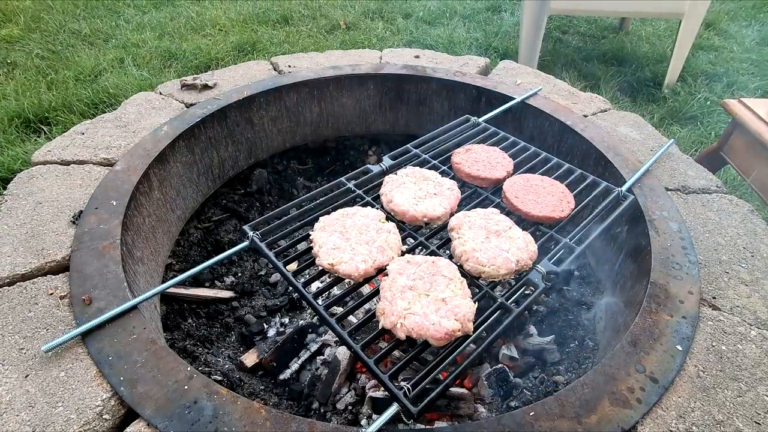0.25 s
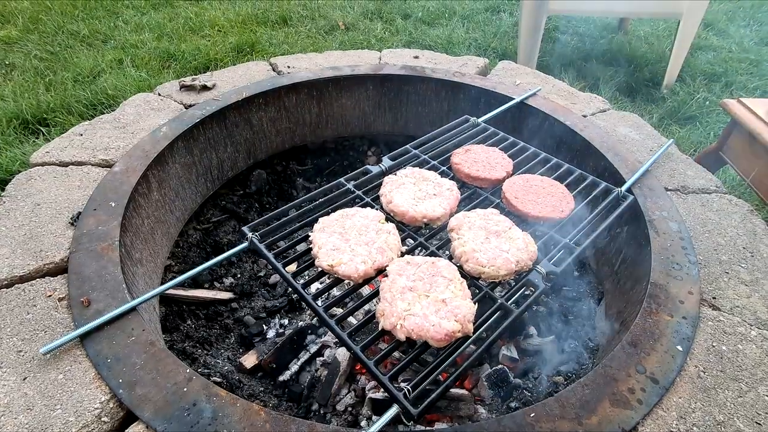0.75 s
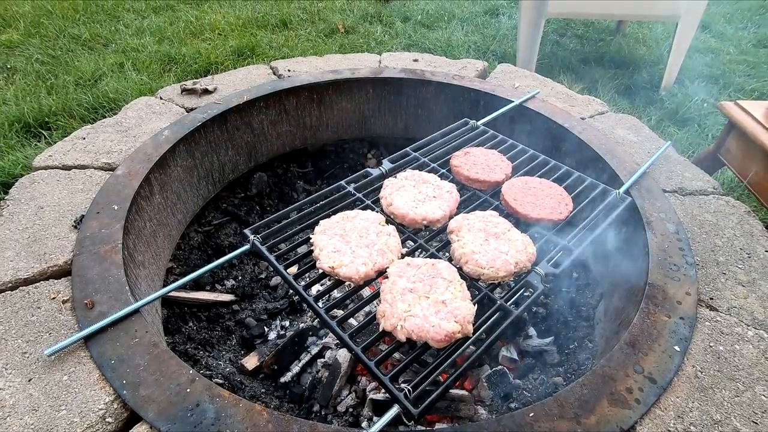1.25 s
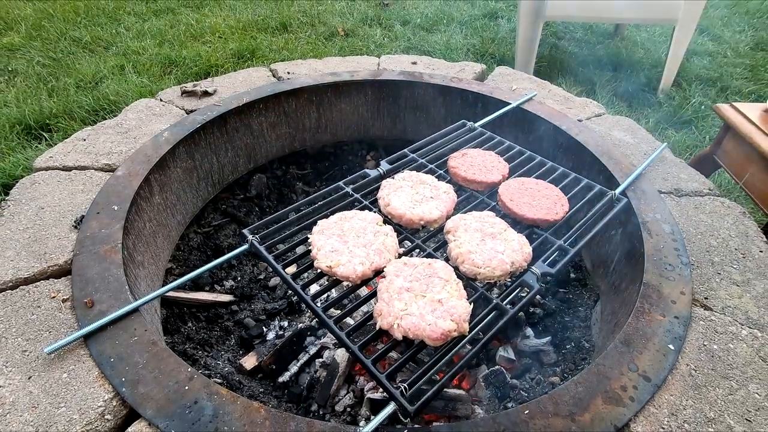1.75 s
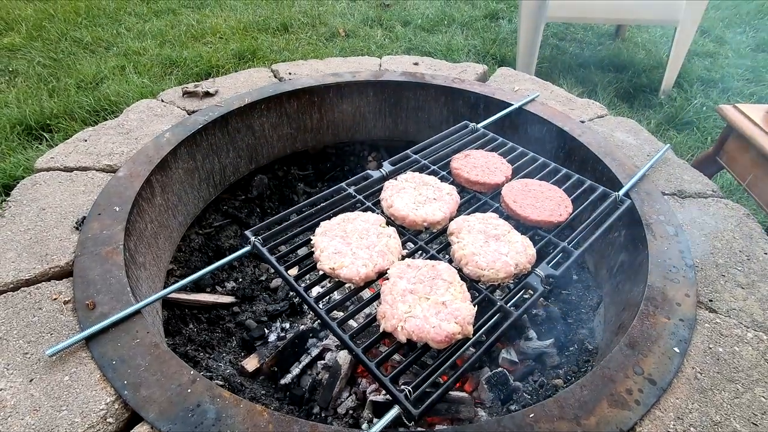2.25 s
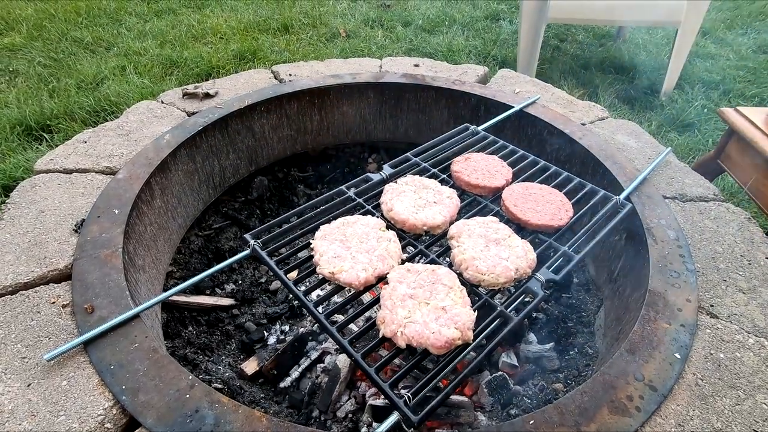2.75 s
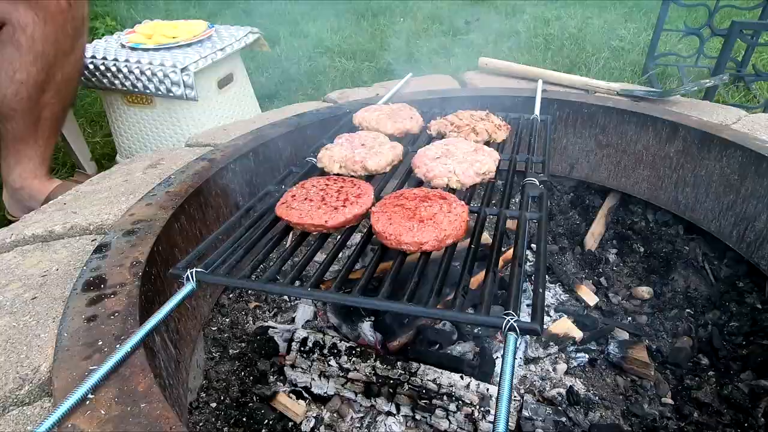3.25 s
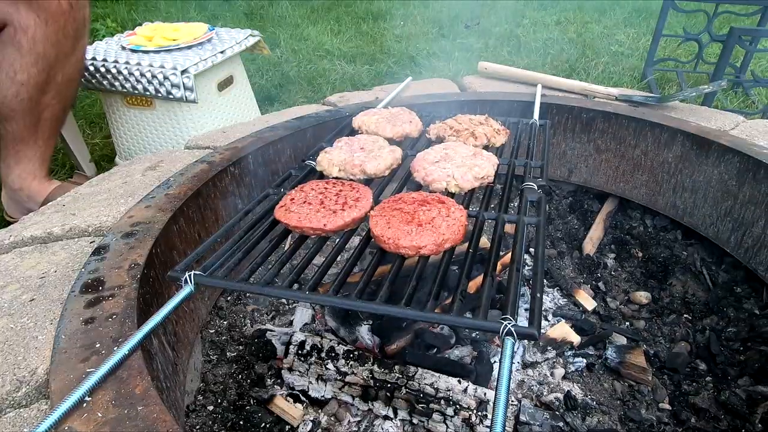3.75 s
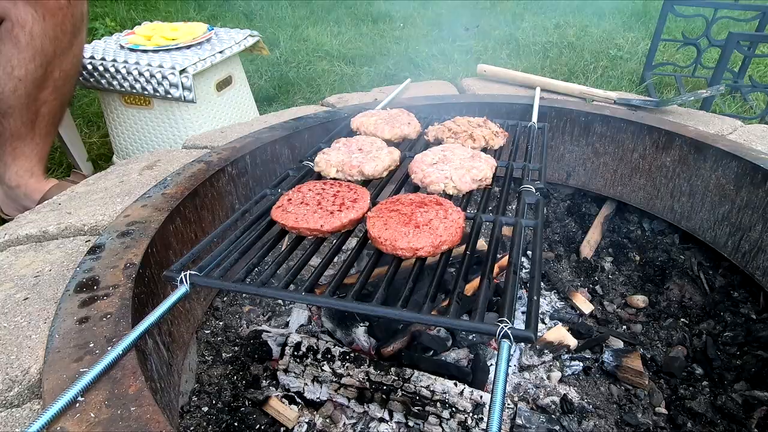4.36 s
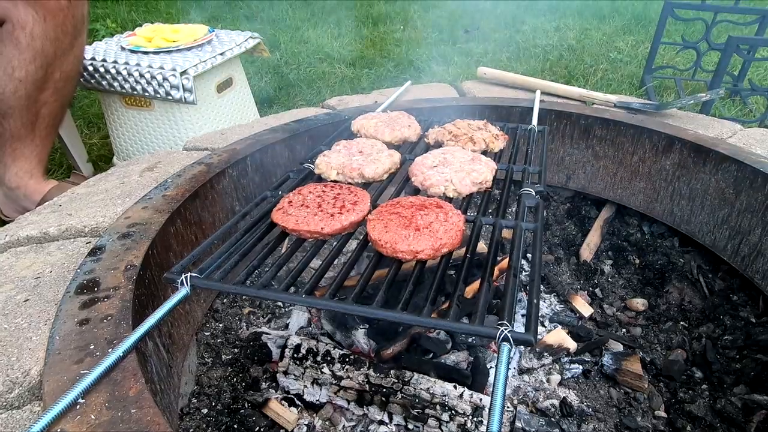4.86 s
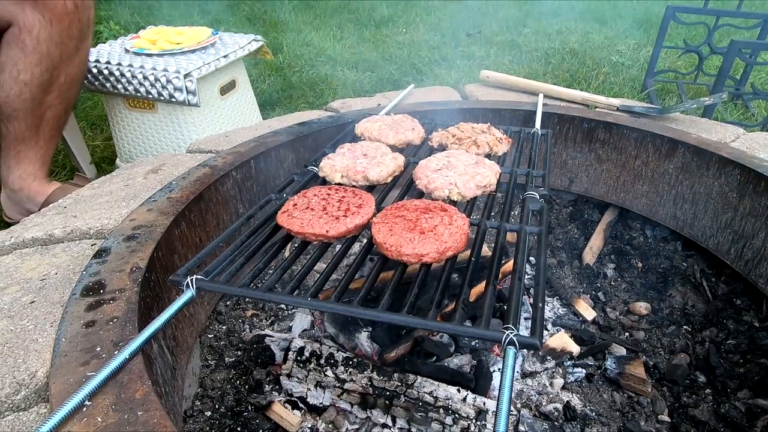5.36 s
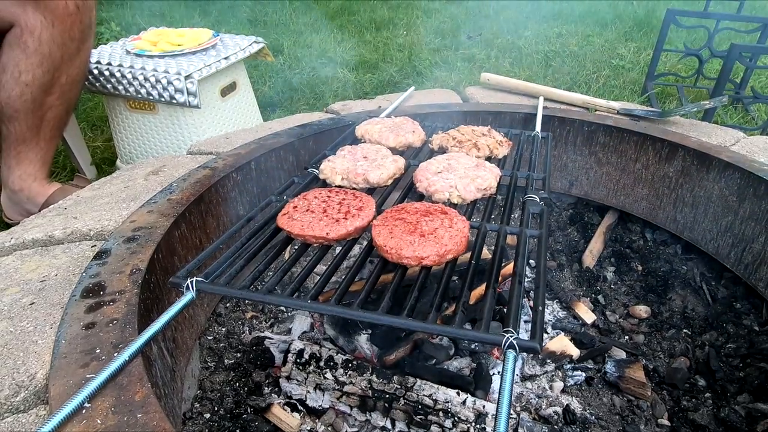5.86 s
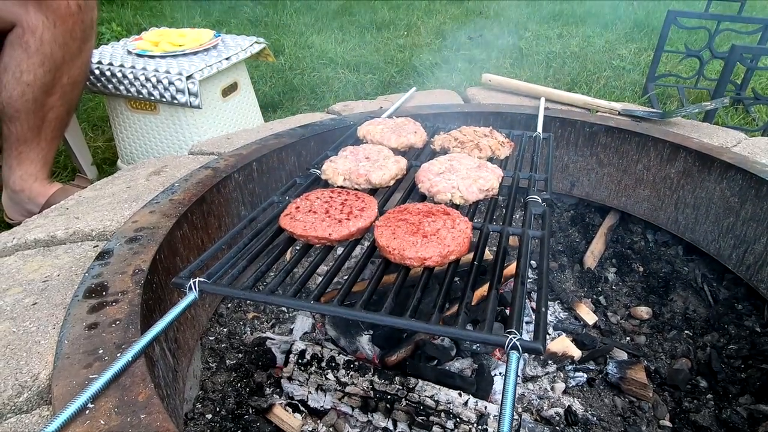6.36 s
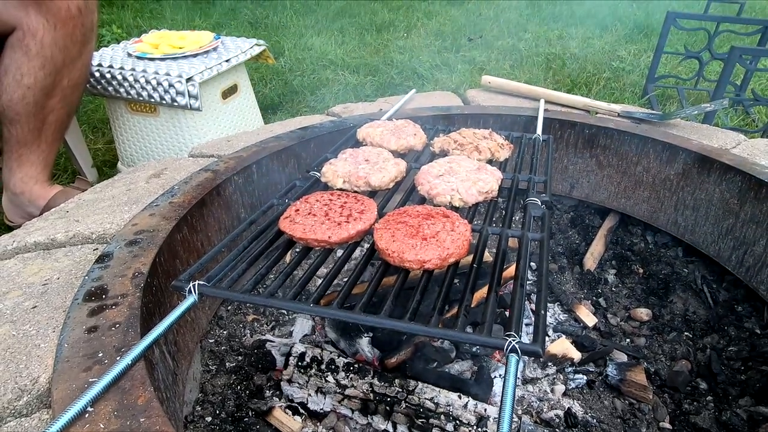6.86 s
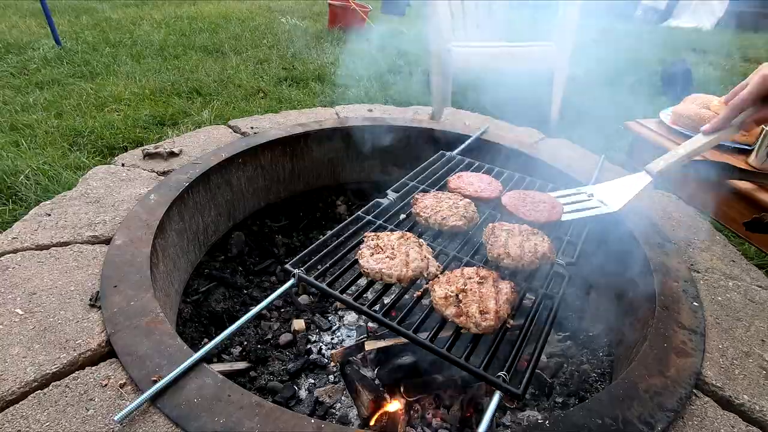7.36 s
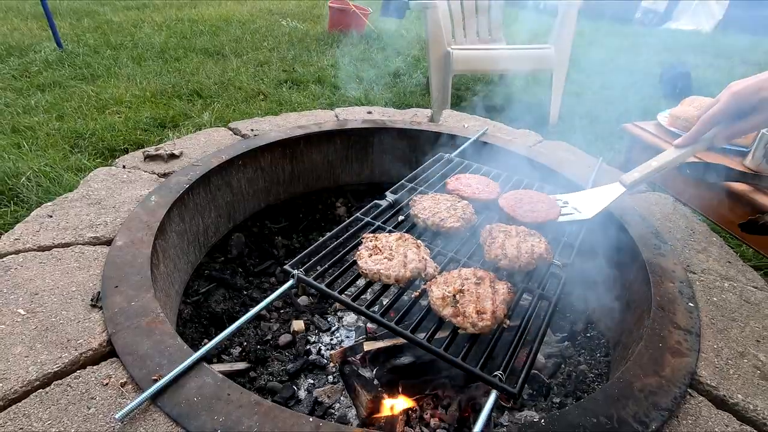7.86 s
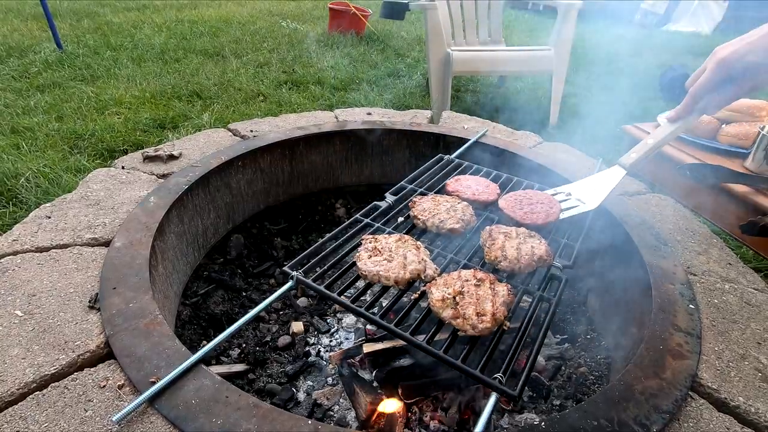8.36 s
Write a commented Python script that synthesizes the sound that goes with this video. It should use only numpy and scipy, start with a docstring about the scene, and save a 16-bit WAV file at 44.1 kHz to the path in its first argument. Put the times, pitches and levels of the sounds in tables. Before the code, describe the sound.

Outdoors, close to a fire pit, frying patties give a steady, thin, high fizz with tiny spitting ticks. After about three seconds the position shifts: fat hisses on coals and embers pop, two of them sharply. At the end, another shift brings a metal spatula scraping in quick shoves, groaning and clinking against the grate, while a small bird trills. Faint distant traffic hums underneath; one channel.

```python
"""Frying fat fizzes first: meat patties on a steel grate over a garden fire pit, heard from three spots in turn.
Bursting bubbles are random clicks; drips hiss on the coals, and embers pop with crackle and short rings.
Near the end a metal spatula scrapes in short shoves: sticking and slipping drives the modes of blade and grate.
A small bird trills then, in sine notes arched in pitch. Light air and distant traffic, shaped noise
and wavering tones, lie below."""
import sys
import numpy as np
from scipy import signal
from scipy.fft import rfft, irfft, next_fast_len
from scipy.io import wavfile

SR = 44100
rng = np.random.default_rng(int(sys.argv[2]) if len(sys.argv) > 2 else 0)


def dump(signal):
    """Clip the signal to [-1, 1] and save it as 16-bit WAV at the path in sys.argv[1]."""
    limited = np.clip(np.atleast_2d(signal).T, -1, 1)
    pcm = np.round(limited * 32767).astype(np.int16)
    wavfile.write(sys.argv[1], SR, pcm)


N = 380141
TIME = np.arange(N) / SR

# Listening spots; the frying also gets a makeup gain: [start_s, frying_drive_db, coals_hiss_db]
SPOTS = [(0, -64, -77), (3.287, -68, -66), (7.295, -70.5, -87)]
# Slow rise and fall of the heat, which the frying follows: [time_s, change_db]
HEAT = [(0, 0.5), (.35, 0.5), (1.05, -1), (2.1, 1.5), (3.0, 0.4), (5.9, 0.5), (6.6, -1), (8.6, 1)]
# Relative spectrum of the frying fat, close by: [freq_hz, density_db_per_hz]
FIZZ_NEAR = [(1500, -13.5), (3000, -10), (5500, -7), (6700, -6.5), (7600, -1), (8600, -0.5), (9500, -2.5),
             (10400, -7.5), (11600, -7.5), (12700, -4.5), (14000, -3.5), (15700, -8)]
# Relative spectrum of the frying fat, from across the pit: [freq_hz, density_db_per_hz]
FIZZ_FAR = [(1500, -12), (3100, -6), (4700, -5.5), (5700, 1), (6500, -2), (7600, 3), (8700, -1),
            (9500, -2.5), (10500, -6.5), (12000, -5), (13700, -4), (15700, -7)]
# Droplets of fat spitting, dry and without pitch: [start_s, level_db, lowest_hz]
SPITS = [(.3414, -40, 6920), (2.6508, -43, 5000), (3.684, -39, 6000), (4.2409, -42, 6000),
         (4.3634, -38.5, 7000), (5.859, -42.5, 2990), (7.663, -43.5, 1500), (8.086, -38, 6000),
         (8.568, -39, 4000)]
SPIT_T60_S = 0.0088
# Fat drips flaring up on the coals: [peak_s, swell_s, fade_db_per_s, hiss_db, frying_surge_db]
DRIPS = [(1.68, .17, 68.5, -61, -0.5), (3.22, 0.037, 30, -59.5, 3), (3.54, 0.012, 13, -54.5, -2),
         (7.149, 0.18, 6, -65, 2.5)]
# Relative spectrum of fat boiling off the coals: [freq_hz, density_db_per_hz]
FLARE_COLOUR = [(900, -17.5), (1900, -9.5), (3000, -10), (4200, -7.5), (4700, -6.5), (5050, -6.5),
                (5700, -6), (6700, -14.5), (8200, -6), (8900, -2.5), (9900, -13.5), (11200, -15),
                (13500, -6.5), (15700, -16)]
# Hollows between the coals that colour each crackle: [pitch_hz, level_db]
HOLLOWS = [(2040, -6), (4650, -1), (5450, -2.5), (8800, 1)]
CRACKLES_PER_S, CRACKLE_DB = 28, -6.5   # bursts per hollow; level of all of them against the smooth hiss
# Popping embers: [start_s, crack_db, crack_t60_s, lowest_hz, rings of the split piece [pitch_hz, level_db, t60_s]]
POPS = [(3.3334, -52.5, 0.02, 4000, [(4700, -50, .035), (9850, -46, .035), (13600, -50, .03)]),
        (3.6208, -48, 0.01, 1700, [(4700, -48, .017), (9000, -54, .024)]),
        (3.849, -47, .022, 1500, [(4640, -52, .02), (5600, -57, .02)]),
        (4.032, -48, .011, 4000, [(6600, -52, .017), (8050, -47, .024)]),
        (4.113, -46, 0.026, 8050, [(8980, -49, .035)]), (4.2824, -37, 0.0092, 3270, [(3900, -40, .012),
        (4500, -43, .012), (6850, -39, .008), (9000, -39, .011), (9600, -37, .011)]),
        (4.6205, -51.5, 0.013, 3000, [(4700, -52, .017), (6900, -45, 0.018)]),
        (5.0642, -36.5, 0.047, 400, [(780, -59, .04), (1560, -40.5, 0.037), (3730, -42, 0.049),
        (4570, -39, 0.034), (6050, -41.5, 0.099), (6540, -40, 0.04), (8586, -41, 0.023), (8100, -40, 0.033),
        (8800, -42, 0.026), (15100, -44, .025)]), (5.6172, -32, 0.012, 4400, [(3020, -53, .06),
        (3800, -36.5, 0.032), (4500, -51, .055), (5100, -49, 0.026), (6215, -28, 0.028),
        (8000, -27.5, 0.016), (8800, -26, 0.012), (9700, -44, .04), (10700, -37, 0.012), (12500, -31, .011),
        (14200, -36, .011)]), (5.9979, -49.5, 0.0088, 8000, [(13700, -48.5, .018)]),
        (6.9535, -52, .0067, 8000, [(11200, -35.5, 0.009)])]
# Relative spectrum of a pop's crackle: [freq_hz, density_db_per_hz]
POP_COLOUR = [(400, -22), (1300, -16), (2200, -3.5), (3800, 1), (7000, -3), (8000, -2), (8900, 1),
              (10300, -8), (11600, -8), (12600, -9), (15700, -4.5)]
POP_RAGGED_DB = 3.5   # unevenness of a pop's run of fractures
# Shoves of the spatula: the edge bites broadly, and friction locks onto a low and a high pitch of the bars.
# [peak_s, swell_s, fade_s, grate_drive_db, rasp_drive_db, bite_hz, bite_db,
#  groan_hz, groan_db, squeal_hz, squeal_db]
SHOVES = [(7.303, 0.0036, 0.024, -51.5, -53.5, 1270, -57.5, 734, -58, 2120, -59),
          (7.386, .016, 0.022, -56, -55, 2630, -60, 734, -58, 2120, -64),
          (7.478, 0.017, 0.022, -55, -55, 2300, -58, 720, -60, 4700, -61),
          (7.526, 0.024, 0.022, -49.5, -53, 2800, -58, 748, -54, 2045, -51.5),
          (7.585, 0.03, 0.049, -63, -72, 1080, -64, 744, -55.5, 2890, -75),
          (7.72, 0.013, 0.015, -51.5, -52, 1510, -59, 657, -46.5, 2250, -63),
          (7.745, 0.0076, .019, -52.5, -50.5, 2330, -55, 452, -56, 3150, -53),
          (7.925, 0.016, .035, -73, -61, 1480, -72, 675, -70, 2740, -66),
          (8.122, 0.029, 0.028, -59, -60, 1070, -65, 743, -71, 2130, -68),
          (8.235, .012, 0.013, -51.5, -50, 3100, -60, 452, -58, 2250, -55),
          (8.257, 0.0071, 0.012, -48.5, -48, 1090, -55, 690, -41, 2150, -55),
          (8.292, 0.01, 0.016, -55, -60, 5400, -66, 727, -58, 2080, -60),
          (8.378, .01, 0.042, -56, -53.5, 4700, -60.5, 710, -63, 2150, -63),
          (8.497, 0.013, 0.0075, -46.5, -52.5, 3200, -58, 520, -58, 2050, -55),
          (8.514, .009, .02, -55, -64, 500, -54, 732, -49, 2060, -62)]
BITE_CYCLES = 11   # cycles for the bite's resonance to die by 60 dB
SNAGS_PER_S, SNAG_DB = 190, -5   # the blade snags on crumbs of crust; level against the smooth rasp
SHUDDER_DB, SHUDDER_S = -11, 0.052   # the grate shudders on after each shove; time constant
RUB_FROM_S, RUB_DB, RUB_UNEVEN_DB = 7.295, -67.5, 4   # between shoves the blade rubs unevenly on the bars
FRICTION_WAVER, FRICTION_ROUGH_DB = 0.0176, 2.5   # waver of a groan or squeal, as share of its pitch; roughness
# Ringing modes of the grate: [pitch_hz, relative_level_db, t60_s]
GRATE = [(370, -15, .06), (452, -9, .14), (510, -13, .15), (562, -14, .15), (640, -10, .1), (672, -4, .16),
         (730, -5, .16), (762, -9, .1), (800, -15, .1), (908, -16, .18), (1051, -9, .16), (1121, -9, .18),
         (1400, -13, .18), (1491, -15, .2), (1550, -14, .2), (2045, -6, .16), (2110, -11, .12),
         (2200, -10, .06), (2272, -10, .08), (2471, -18, .1), (2685, -12, .1), (2893, -13, .12),
         (3153, -12, .08), (3316, -17, .08), (3500, -17, .06), (3965, -16, .06), (4619, -15, .05),
         (4722, -15, .06), (5580, -16, .06), (6170, -16, .06)]
# Ringing modes of the blade: [pitch_hz, relative_level_db, t60_s]
BLADE = [(2250, -15, .016), (3200, -15, 0.016), (4700, 0, .028), (5600, -1, 0.032), (6220, 1, 0.035),
         (8000, -11, 0.024), (8620, 3, .02), (9320, 4, 0.023)]
# Relative spectrum of the blade's rasp: [freq_hz, density_db_per_hz]
BLADE_COLOUR = [(180, -21), (330, 3.5), (800, 2), (1250, 1), (1750, 2.5), (2200, 1.5), (3800, 1),
                (4700, 1.5), (7000, 2), (9300, 4.5), (10500, -3.5), (15500, -1.5)]
BLADE_RING_DB, BLADE_SCRATCH_DB = -13, -2   # ringing and dry scratch, against the drive
CONTACT_DETUNE, CONTACT_SPREAD_DB = 0.005, 3.5   # each new contact shifts the modes' pitches (share) and strengths
# The blade catches on a bar and clinks free: [start_s, drive_db, t60_s]
CATCHES = [(7.3678, -48, .025), (7.511, -42, 0.046), (8.2133, -47, .012), (8.4899, -44, 0.036)]
CATCH_GRATE_DB = -7   # the grate's answer, against the drive
# Relative spectrum of the garden's steady background: [freq_hz, density_db_per_hz]
GARDEN = [(45, 2), (70, 2), (125, 2), (200, -6), (270, -5.5), (400, -13), (550, -15), (900, -13.5),
          (1500, -18.5), (3000, -20.5), (8000, -26.5), (16000, -55)]
# Drone of distant engines, each gliding in pitch: [start_s, end_s, first_hz, last_hz, base_db]
DRONE = [(0, 3.28, 114.6, 120.4, -69.5), (0, 3.6, 146, 137.7, -70), (3.29, 6.4, 184, 166, -72.5),
         (3.29, 7.3, 261.4, 259.2, -77.5)]
# Relative spectrum of air swelling slowly on the microphone: [freq_hz, density_db_per_hz]
AIR = [(1, -13), (4, 1.5), (9.5, 0.5), (14, -18), (25, -23.5), (35, -28.5), (50, -37), (100, -72),
       (400, -120)]
BREEZE_DB, GUST_DB, GUSTS_PER_S = -38.5, 1.3, 1.7   # mostly below hearing
CUTOFF_HZ = 15800


def frying():
    """Countless bursting fat bubbles merge into a fizz and larger ones tick; heat and flare-ups drive it."""
    fizz = grains(per_s=16000, spread_db=3.0)
    tick_pitches_hz = np.geomspace(3500, 15000, 14)
    ticks = sum(ring(grains(per_s=40, spread_db=3.0), hz, t60=.003) for hz in tick_pitches_hz)
    flicker_db = 0.86 * drift(23) + 0.5 * drift(5.5)
    bubbles = (fizz + from_db(-11.5) * rms_one(ticks)) * from_db(flicker_db)
    near = from_db(6.0) * coloured(bubbles, FIZZ_NEAR)
    far = from_db(5.5) * coloured(bubbles, FIZZ_FAR)
    spot_db, _ = spot_levels()
    surge_db = sum(db * flare_up(s, swell, fade) for s, swell, fade, _, db in DRIPS)
    level = from_db(spot_db + in_time(HEAT) + surge_db)
    return level * np.where(spot_at(TIME) == 0, near, far)


def spits():
    """Droplets of fat spit with a dry tick; fainter, thinner ones come at random."""
    tick_pitches_hz = np.geomspace(4500, 15000, 10)
    ticks = sum(ring(grains(per_s=14, spread_db=2.8), hz, t60=.002) for hz in tick_pitches_hz)
    out = from_db(spot_levels()[0] - 9.0) * rms_one(ticks)
    age = np.arange(SR // 20) / SR
    for s, db, lowest_hz in SPITS:
        burst = rng.choice([-1., 1.], len(age)) * from_db(db - 60 * age / SPIT_T60_S)
        add(out, s, high_passed(burst, lowest_hz))
    return out


def flare():
    """Fat that lands on a coal boils away in a rough, crackling hiss."""
    _, steady_db = spot_levels()
    drip_power = sum((from_db(db) * flare_up(s, swell, fade)) ** 2 for s, swell, fade, db, _ in DRIPS)
    power = from_db(steady_db) ** 2 + drip_power
    hiss = coloured(grains(per_s=6000, spread_db=3.0), FLARE_COLOUR)
    boiling = hiss + from_db(CRACKLE_DB) * sputters()
    return np.sqrt(power) * from_db(1.0 * drift(27)) * rms_one(boiling)


def sputters(t60=.012, cycles=12):
    """Pockets of fat boil off in short bursts, each coloured by one hollow between the coals; rms 1."""
    out = 0
    r = from_db(-120 / (t60 * SR))   # decay of power, hence twice the dB
    for hz, db in HOLLOWS:
        bursts = grains(per_s=CRACKLES_PER_S, spread_db=2.0) ** 2
        power = signal.lfilter([1], [1, -r], bursts + 1e-18)
        force = np.sqrt(power) * rng.standard_normal(N)
        out = out + from_db(db) * rms_one(ring(force, hz, cycles / hz))
    return rms_one(out)


def flare_up(s, swell_s, fade_db_per_s):
    """A drip catches, then boils away steadily; it is heard from one spot only."""
    rise = np.where(TIME < s, swelling(s, swell_s), 1)
    fade = from_db(-fade_db_per_s * np.maximum(TIME - s, 0))
    return rise * fade * (spot_at(TIME) == spot_at(s))


def pops():
    """A pocket of steam bursts: a run of fractures, a dying crackle, and short rings of the piece that split."""
    out, age = np.zeros(N), np.arange(SR // 8) / SR
    for s, crack_db, crack_t60, lowest_hz, modes in POPS:
        splitting_s = .07 * crack_t60   # full strength before the decay
        envelope = from_db(-60 * np.maximum(age - splitting_s, 0) / crack_t60)
        envelope = envelope * from_db(POP_RAGGED_DB * drift(210)[:len(age)])
        noise = coloured(rng.choice([-1., 1.], len(age)), POP_COLOUR)
        crackle = high_passed(noise * envelope, lowest_hz)
        crackle = rms_one(crackle) * np.sqrt(np.mean(envelope ** 2))
        rings = np.zeros(len(age))
        for k, (hz, db, t60) in enumerate(modes):
            sign = (-1) ** k
            rings += sign * from_db(db - 60 * age / t60) * np.sin(2 * np.pi * hz * age)
        # a small piece radiates nothing far below its lowest ring
        rings = high_passed(rings, .83 * modes[0][0])
        add(out, s, from_db(crack_db) * crackle + rings)
    return out


def pit_echo(x, delay_s=0.0128, echo_db=-24, scatter_db=-22, scatter_t60=0.12):
    """One faint reflection off the steel wall of the pit, and a brief scatter from the stones around it."""
    age = np.arange(SR // 5) / SR
    scatter = rng.standard_normal(len(age)) * from_db(-60 * age / scatter_t60)
    tail = signal.fftconvolve(x, scatter / np.linalg.norm(scatter))[:N]
    echo = np.interp(TIME - delay_s, TIME, x, left=0)
    return x + from_db(echo_db) * echo + from_db(scatter_db) * tail


def spatula():
    """The blade sticks and slips on the crusted bars: it rasps, groans and squeals; each slip rings the grate."""
    slips = rms_one(grains(per_s=4000, spread_db=1.5) * from_db(2.0 * drift(105)))
    rasp = rms_one(slips + from_db(SNAG_DB) * grains(per_s=SNAGS_PER_S, spread_db=1.0))
    scratch = coloured(rasp, BLADE_COLOUR)
    pressure = from_db(RUB_DB + RUB_UNEVEN_DB * drift(21)) * (TIME > RUB_FROM_S)
    out = touched(pressure * slips, GRATE) + from_db(-4.5) * pressure * scratch
    for (s, swell_s, fade_s, grate_db, rasp_db, bite_hz, bite_db,
         groan_hz, groan_db, squeal_hz, squeal_db) in SHOVES:
        part = slice(round((s - .15) * SR), round((s + .5) * SR))
        age = TIME[part] - s
        shape = swelling(s, np.where(TIME < s, swell_s, fade_s))[part]
        shudder = from_db(SHUDDER_DB) * np.exp(-np.abs(age) / SHUDDER_S) * (age > 0)
        out[part] += from_db(grate_db) * touched(slips[part] * np.maximum(shape, shudder), GRATE)
        out[part] += from_db(rasp_db) * blade(rasp[part] * shape, scratch[part] * shape)
        bite = rms_one(ring(rng.standard_normal(len(age)), bite_hz, BITE_CYCLES / bite_hz))
        out[part] += from_db(bite_db) * shape * bite
        groan = from_db(groan_db) * friction_tone(groan_hz, part)
        squeal = from_db(squeal_db) * friction_tone(squeal_hz, part)
        out[part] += shape * (groan + squeal)
    return out


def friction_tone(hz, part):
    """Sticking and slipping locks onto one pitch, wavering and rough; rms 1."""
    pitch = hz * (1 + FRICTION_WAVER * drift(69)[part])
    roughness = from_db(FRICTION_ROUGH_DB * drift(77)[part])
    return rms_one(roughness * np.sin(2 * np.pi * np.cumsum(pitch) / SR))


def catches():
    """The blade's edge snaps free of a bar: a sudden, dying chatter in blade and grate."""
    out, age = np.zeros(N), np.arange(SR // 4) / SR
    for s, db, t60 in CATCHES:
        chatter = rng.choice([-1., 1.], len(age))
        envelope = from_db(db - 60 * age / t60)
        force = chatter * envelope
        clink = blade(force, coloured(chatter, BLADE_COLOUR) * envelope)
        add(out, s, clink + from_db(CATCH_GRATE_DB) * touched(force, GRATE))
    return out


def blade(force, scratch):
    """The thin blade scratches and rings."""
    return from_db(BLADE_SCRATCH_DB) * scratch + from_db(BLADE_RING_DB) * touched(force, BLADE)


def touched(force, modes):
    """A body driven at one contact, which sets how its modes are tuned and shared; keeps the force's level."""
    hz, db, t60 = np.transpose(modes)
    shift, strength = rng.standard_normal((2, len(modes)))
    gains = from_db(db + CONTACT_SPREAD_DB * strength)
    # longer rings build up more, so each gain is evened out by its decay
    gains = gains / np.linalg.norm(gains) * np.sqrt(np.log(1000) / (t60 * SR))
    tuned_hz = hz * (1 + CONTACT_DETUNE * shift)
    return sum(g * ring(force, f, t) for g, f, t in zip(gains, tuned_hz, t60))


def bird(start=7.334, period=.0651, note_s=0.018, top_hz=7340, arch_hz=650, base_db=-60):
    """An even trill of thin notes, each arching up and down in pitch; the first notes are softer."""
    from_centre_s = (((TIME - start) / period + .5) % 1 - .5) * period
    place = np.clip(from_centre_s / (note_s / 2), -1, 1)   # -1 to 1 across each note
    pitch = top_hz + 60 * drift(86.5) - arch_hz * place ** 2
    swell = np.cos(np.pi / 2 * place) * (TIME > start - period / 2)
    effort_db = base_db + in_time([(7.33, -1), (7.52, 2), (7.6, 2.5)]) + 2.4 * drift(40)
    return from_db(effort_db) * swell * np.sin(2 * np.pi * np.cumsum(pitch) / SR)


def garden():
    """Far traffic with wavering engine tones, and air leaning on the microphone."""
    out = from_db(-60.5) * coloured(rng.standard_normal(N), GARDEN)
    for start, end, first_hz, last_hz, db in DRONE:
        pitch = in_time([(start, first_hz), (end, last_hz)]) + 2.19 * drift(1.93)
        tone = np.sin(2 * np.pi * np.cumsum(pitch) / SR)
        out += from_db(db + 4.9 * drift(3.7)) * tone * ((TIME >= start) & (TIME < end))
    breeze = from_db(BREEZE_DB + GUST_DB * drift(GUSTS_PER_S))
    return out + breeze * coloured(rng.standard_normal(N), AIR)


def spot_at(s):
    """Number of the listening spot at a time."""
    return np.searchsorted([row[0] for row in SPOTS[1:]], s, side="right")


def spot_levels():
    """Drive of the frying and level of the coals' hiss at each moment, in dB."""
    return np.array(SPOTS)[spot_at(TIME), 1:].T


def grains(per_s, spread_db):
    """Tiny clicks at random moments, many weak and a few strong; rms 1."""
    sizes = from_db(spread_db * np.minimum(rng.exponential(1, N), 6))
    happens = rng.random(N) < per_s / SR
    return rms_one(sizes * rng.choice([-1, 1], N) * happens)


def ring(force, hz, t60):
    """One decaying mode driven by a force; it radiates nothing at zero frequency."""
    r, w = from_db(-60 / (t60 * SR)), 2 * np.pi * hz / SR
    faint_noise = 1e-18 * rng.standard_normal(len(force))   # keeps the filter off exact silence
    return signal.lfilter([1, 0, -1], [1, -2 * r * np.cos(w), r * r], force + faint_noise)


def drift(rate):
    """Smooth chance with spread 1, changing about rate times a second."""
    r = np.exp(-80 * np.pi * rate / SR)   # computed at every 40th sample
    slow = signal.lfilter([1], [1, -2 * r, r * r], rng.standard_normal(N // 40 + 2002))[2000:]
    return np.interp(np.arange(N) / 40, np.arange(len(slow)), rms_one(slow))


def coloured(x, spectrum):
    """Gives a sound the spectrum (Hz, dB), joined along log frequency; rms 1."""
    hz, db = np.transpose(spectrum)
    size = next_fast_len(len(x))
    bins = np.maximum(np.arange(size // 2 + 1) * SR / size, .5)
    gain = from_db(np.interp(np.log(bins), np.log(hz), db))
    return rms_one(irfft(rfft(x, size) * gain, size)[:len(x)])


def high_passed(x, hz):
    """A steep cut below hz."""
    return signal.sosfilt(signal.butter(8, hz, "high", fs=SR, output="sos"), x)


def swelling(s, width_s):
    """A bell-shaped swell of height 1 around time s."""
    return np.exp(-.5 * np.minimum(((TIME - s) / width_s) ** 2, 40))


def in_time(rows):
    """A curve over time joined by straight lines."""
    return np.interp(TIME, *np.transpose(rows))


def add(out, s, sound):
    """Mixes a sound in at time s."""
    at = round(s * SR)
    out[at:at + len(sound)] += sound[:N - at]


def from_db(db):
    """Amplitude factor of a level in dB."""
    return 10 ** (np.asarray(db) / 20)


def rms_one(x):
    """Scales a sound to rms 1."""
    return x / np.sqrt(np.mean(x ** 2) + 1e-20)


def scene():
    """Everything around the fire pit, in one channel."""
    fire = frying() + spits() + flare() + pit_echo(pops())
    return (fire + spatula() + catches() + bird() + garden())[None]


def record(dry):
    """A steep elliptic low-pass cuts the top."""
    return signal.sosfilt(signal.ellip(10, .1, 70, CUTOFF_HZ, fs=SR, output="sos"), dry)


dry = scene()
out = record(dry)
dump(out)
```